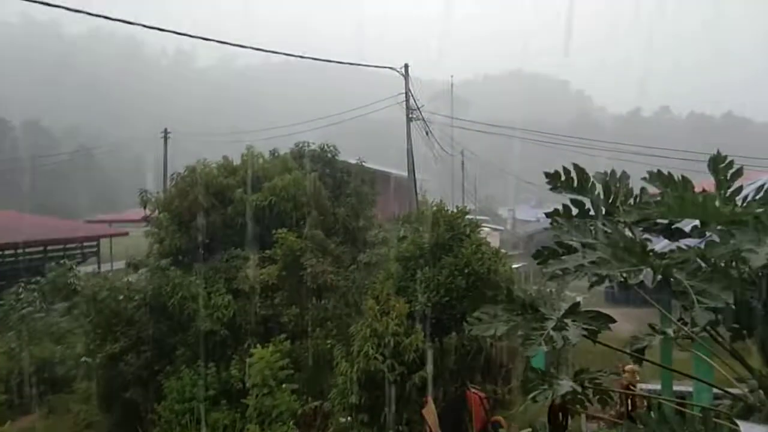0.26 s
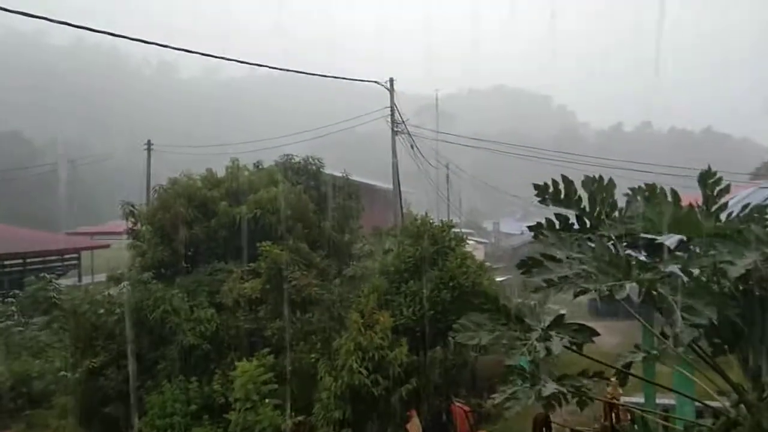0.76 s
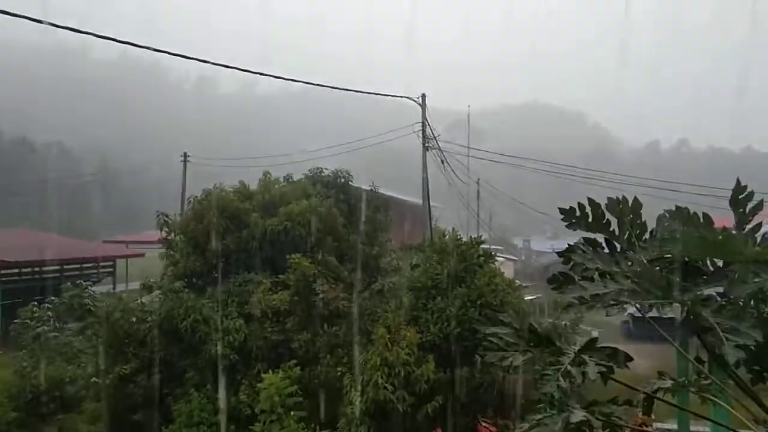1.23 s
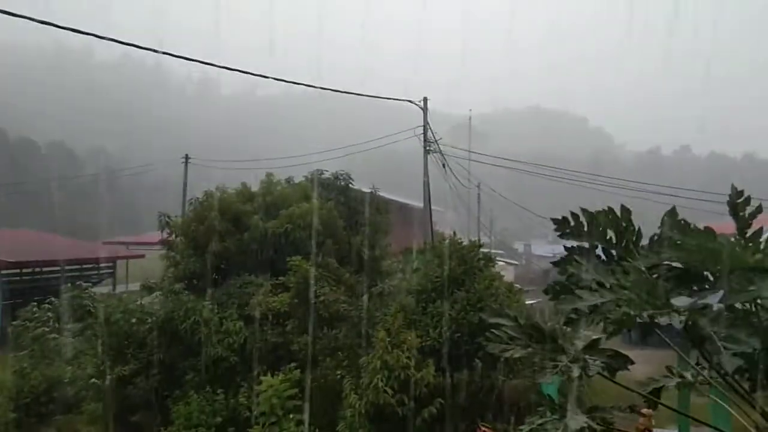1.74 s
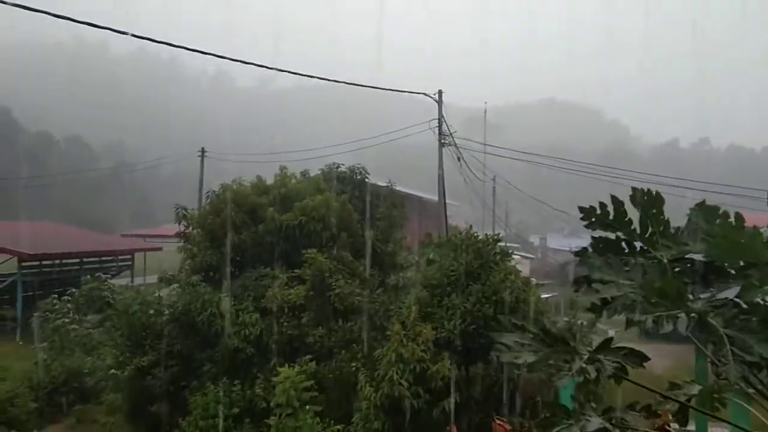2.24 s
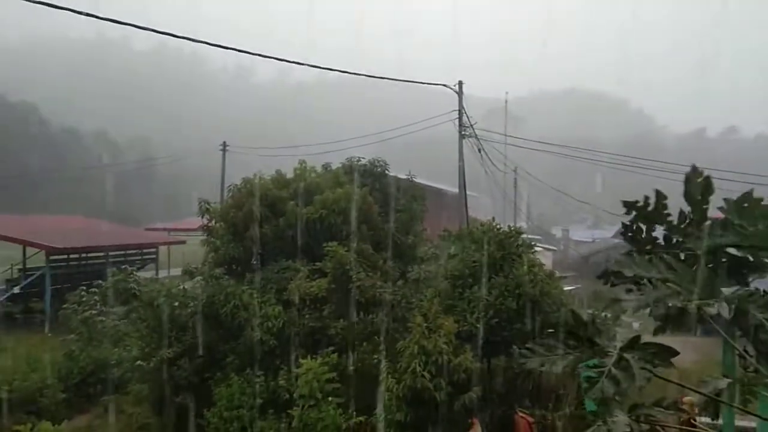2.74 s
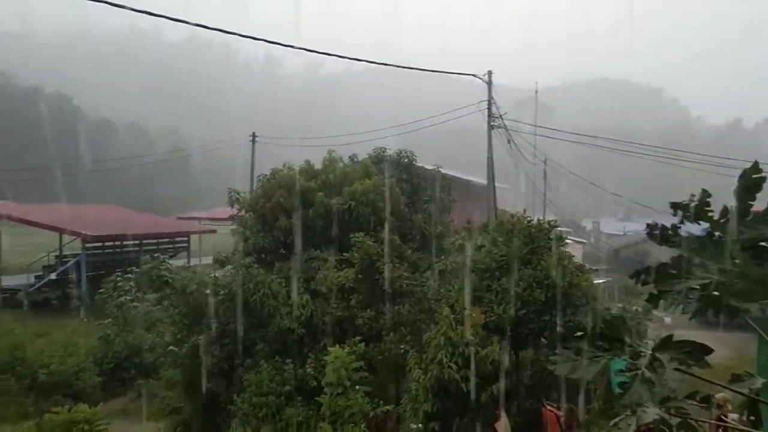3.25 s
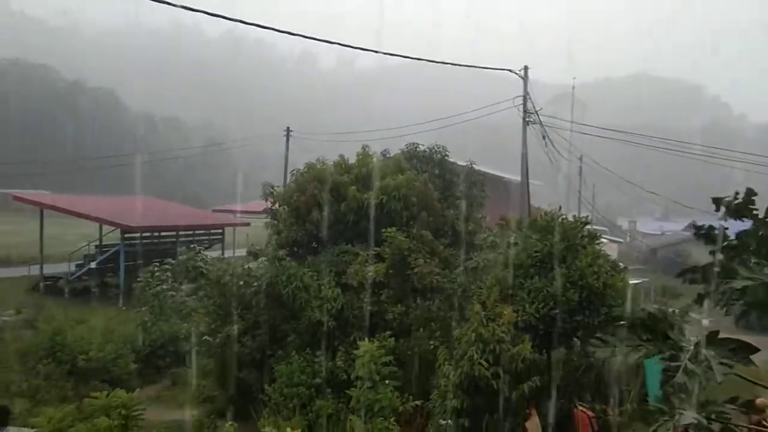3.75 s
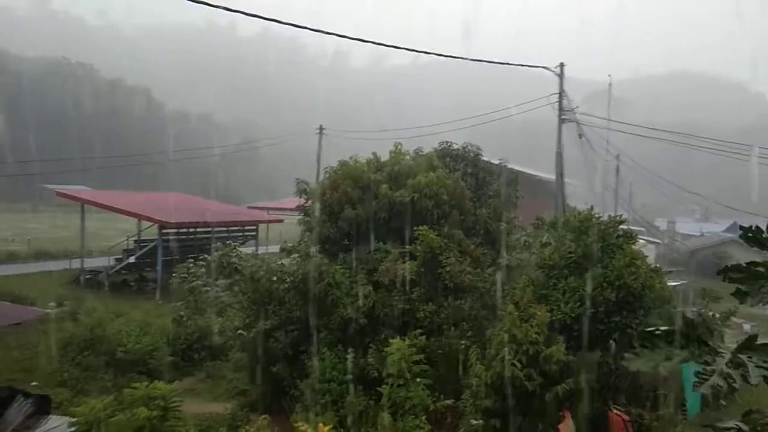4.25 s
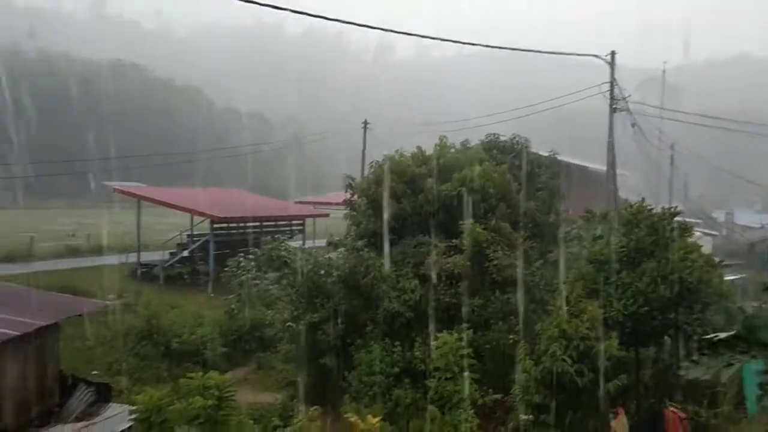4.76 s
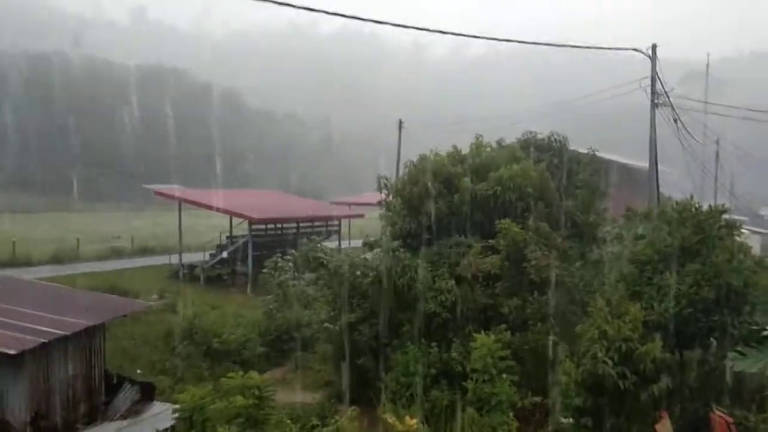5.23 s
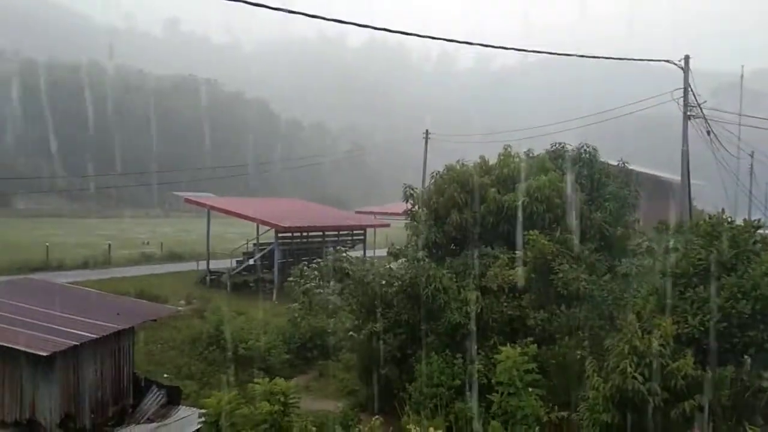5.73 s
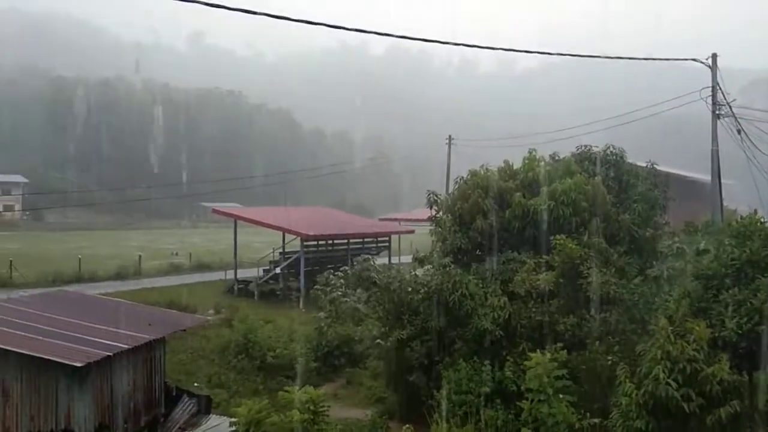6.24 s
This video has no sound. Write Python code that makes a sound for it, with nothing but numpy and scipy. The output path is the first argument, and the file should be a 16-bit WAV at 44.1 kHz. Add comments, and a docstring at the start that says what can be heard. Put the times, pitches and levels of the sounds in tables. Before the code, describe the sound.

Very heavy rain pours steadily on leaves, roofs and puddles outdoors, making a dense, loud hiss.

```python
"""A dense, hissing wash of rain: a tropical downpour over a village, heard through one phone mic.
Countless drops patter on leaves, drum on roofs and ground, and burst into spray that starts bright
and soon settles. Bubbles plink in puddles and a few drops tick close by. Underneath, moving air
rumbles and swells into one soft gust."""
import sys
import numpy as np
from scipy import signal
from scipy.fft import rfft, irfft
from scipy.io import wavfile
from scipy.ndimage import uniform_filter1d, minimum_filter1d

SR = 44100
rng = np.random.default_rng(int(sys.argv[2]) if len(sys.argv) > 2 else 0)


def master(y):
    """Save y as 16-bit WAV."""
    cut = np.clip(np.atleast_2d(y).T, -1, 1)
    pcm = np.round(cut * 32767)  # scale
    wavfile.write(sys.argv[1], SR, pcm.astype(np.int16))


N = 286209


def undb(db):
    """Decibels to gain."""
    return 10 ** (np.asarray(db) / 20)


def unit(x):
    """Scale to rms 1."""
    return x / np.sqrt(np.mean(x ** 2))


def fader(points):
    """Gain at every sample, riding straight in dB between (seconds, dB) points."""
    seconds, db = np.transpose(points)
    return undb(np.interp(np.arange(N) / SR, seconds, db))


def wander(rate_hz):
    """A control signal of rms 1 that slides to a new random value rate_hz times a second."""
    hold = int(SR / rate_hz)
    steps = np.repeat(rng.standard_normal(N // hold + 1), hold)
    return unit(uniform_filter1d(steps, hold)[:N])


def response(colour, size=8192):
    """Impulse response with the given (Hz, dB) colour: sharp attack, short ring."""
    hz, db = np.transpose(colour)
    octave = np.log2(np.maximum(np.arange(size // 2 + 1) * SR / size, 1))
    octaves_outside = np.abs(octave - np.clip(octave, np.log2(hz[0]), np.log2(hz[-1])))
    spectrum_db = np.interp(octave, np.log2(hz), db) - 12 * octaves_outside
    cepstrum = irfft(np.log(undb(spectrum_db)))
    cepstrum[1:size // 2] *= 2  # fold to minimum phase, so the energy comes up front
    cepstrum[size // 2 + 1:] = 0
    return irfft(np.exp(rfft(cepstrum)))


def ring(x, colour):
    """Let impacts or noise ring with a (Hz, dB) colour."""
    return signal.fftconvolve(x, response(colour))[:N]


def shower(colour, drops_per_s, spread_db, flutter_db, flutter_hz):
    """Drops of uneven size land at random; they come in sheets, so the level flutters."""
    hits = rng.poisson(drops_per_s / SR, N)
    sizes = undb(spread_db * np.minimum(rng.exponential(size=N), 5))
    impacts = np.sqrt(hits) * sizes * rng.choice([-1, 1], N)
    return unit(ring(impacts, colour)) * undb(flutter_db * wander(flutter_hz))


def leaf_patter():
    """Drops strike leaves so thickly that they merge into a steady midrange wash."""
    # Tone of one drop on a leaf. Each row: frequency in Hz, relative level in dB.
    leaf_colour = [(550, -35.5), (950, -6), (1500, -2.5), (1950, -2.0), (2300, 0.0), (2650, -0.3),
                   (2950, -2), (3300, -7.5), (3650, -11.5), (5000, -39)]
    return shower(leaf_colour, drops_per_s=12000, spread_db=1.3, flutter_db=0.03, flutter_hz=18)


def roof_drumming(sheet_at_s=3.4, sheet_swell_s=1.46, sheet_rise_db=1.1):
    """Drops drum low on the roofs, lifting a little as a heavier sheet of rain passes over."""
    # Tone of one drop on a roof. Each row: frequency in Hz, relative level in dB.
    roof_colour = [(70, -44), (135, -9), (200, -6), (245, -5.5), (265, -3), (330, -4), (500, -4.5),
                   (590, -0.5), (880, -2.1), (1250, -30), (2000, -82)]
    drumming = shower(roof_colour, drops_per_s=6000, spread_db=1.75, flutter_db=0.22, flutter_hz=8.1)
    sheet = np.exp(-((np.arange(N) / SR - sheet_at_s) / sheet_swell_s) ** 2)
    return drumming * undb(sheet_rise_db * sheet)


def spray(bright_db=2, settled_db=-0.1, bright_until_s=0.52, fade_s=0.89):
    """Droplets thrown off by the impacts hiss; the finest add a bright edge, which soon fades."""
    # Tone of the spray. Each row: frequency in Hz, relative level in dB.
    spray_colour = [(2600, -34), (3700, -7), (4300, -1.1), (5100, 0.3), (5750, 0.7), (6300, -4.2),
                    (7000, -11), (7900, -20), (9000, -26.5), (10100, -30.5), (11800, -41), (15000, -39)]
    # Fader ride on the hiss. Each row: time in seconds, relative level in dB.
    spray_ride = [(0.0, -18.5), (0.51, -18), (1.28, -20.5), (1.41, -18.5), (1.8, -19.5), (3.24, -20),
                  (4.08, -18), (5.93, -19), (5.99, -18), (6.4, -20)]
    hiss = shower(spray_colour, drops_per_s=20000, spread_db=2.0, flutter_db=0.3, flutter_hz=20)
    edge = signal.sosfiltfilt(signal.butter(2, 5400, "high", fs=SR, output="sos"), hiss)
    body = hiss - edge
    fading = np.exp(-np.maximum(np.arange(N) / SR - bright_until_s, 0) / fade_s)
    edge_db = settled_db + (bright_db - settled_db) * fading
    return unit(body + edge * undb(edge_db)) * fader(spray_ride)


def puddle_plinks(count=2600, centre_hz=2453, octaves=0.255, ring_cycles=12, glide=0.016, spread_db=2.5):
    """Drops trap bubbles in puddles: each swells within a cycle, then rings down as its pitch rises."""
    when, pitch, size = rng.random((count, 3)).T
    samples = np.arange(1024)
    hz = centre_hz * 2 ** (octaves * (2 * pitch - 1))[:, None]
    cycles = hz * samples / SR
    age = cycles / ring_cycles
    envelope = (1 - np.exp(-cycles)) * np.exp(-age)
    bubbles = envelope * np.sin(2 * np.pi * cycles * (1 + glide * age / 2))
    gain = undb(-spread_db * np.log(np.maximum(size, .01)))[:, None]  # many soft, a few loud
    positions = (when * N).astype(int)[:, None] + samples
    return unit(np.bincount(positions.ravel(), (gain * bubbles).ravel(), N)[:N])


def near_drops(splash_decay_s=.003, splash_db=-13.5):
    """Each close drop slaps once, then scatters a short splash."""
    # Drops landing by the mic. Each row: start in seconds, relative level in dB.
    landings = [(0.5472, -31), (1.8078, -24), (1.8906, -26), (2.4239, -23), (4.7492, -29), (4.8668, -29),
                (5.6007, -26)]
    # Tone of their sharp slap. Each row: frequency in Hz, relative level in dB.
    slap_colour = [(800, -14), (2500, -4), (6000, 0), (9500, -4), (12000, -20), (15000, -19)]
    track = np.zeros(N)
    t = np.arange(1024) / SR
    for start_s, level_db in landings:
        drop = undb(splash_db) * rng.standard_normal(len(t)) * np.exp(-t / splash_decay_s)
        drop[0] += 1  # the slap, ahead of its splash
        start = int(start_s * SR)
        track[start:start + len(t)] += undb(level_db) * drop
    return ring(track, slap_colour) / np.abs(response(slap_colour)).max()


def wind(bed_db=-46, waver_db=1.3, gust_at_s=3.0, gust_swell_s=0.35, gust_rise_db=9):
    """Low rumble of the air that the rain drags along; one gust swells and dies away."""
    # Tone of the moving air. Each row: frequency in Hz, relative level in dB.
    air_colour = [(15, -22), (37, -22), (50, -15), (70, -7), (96, -4.5), (112, 1.5), (132, -3.5),
                  (180, -32), (300, -100)]
    rumble = unit(ring(rng.standard_normal(N), air_colour))
    gust = np.exp(-np.abs(np.arange(N) / SR - gust_at_s) / gust_swell_s)
    return rumble * undb(bed_db + gust_rise_db * gust + waver_db * wander(rate_hz=4))


def scene():
    """Rain on roofs, leaves and puddles, with spray, close drops and wind, alike in both channels."""
    # How hard the rain beats on all three surfaces. Each row: time in seconds, relative level in dB.
    rain_ride = [(0.0, -16.5), (0.62, -18), (1.32, -17), (6.33, -16), (6.4, -16)]
    surfaces = undb(-10) * roof_drumming() + undb(0.2) * leaf_patter() + undb(-11) * puddle_plinks()
    mono = (fader(rain_ride) * surfaces
            + undb(0.45) * spray()
            + undb(6.5) * near_drops()
            + wind())
    return np.array([mono, mono])


def record(dry):
    """The phone's fast limiter ducks smoothly around the rare highest peaks; the top is cut."""
    ceiling, window, top_hz = .8, 89, 15450  # window in samples, about 2 ms
    needed_gain = ceiling / np.maximum(np.abs(dry), ceiling)
    smooth_gain = uniform_filter1d(minimum_filter1d(needed_gain, window), window)
    top_cut = signal.ellip(10, .1, 80, top_hz, fs=SR, output="sos")
    return signal.sosfilt(top_cut, dry * smooth_gain)


dry = scene()
out = record(dry)
master(out)
```